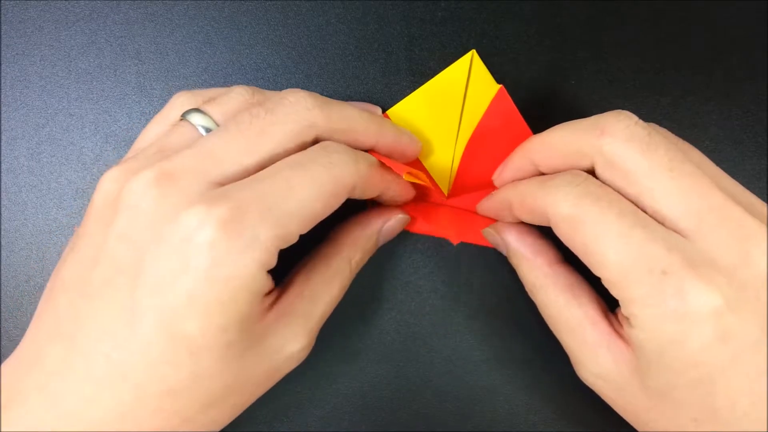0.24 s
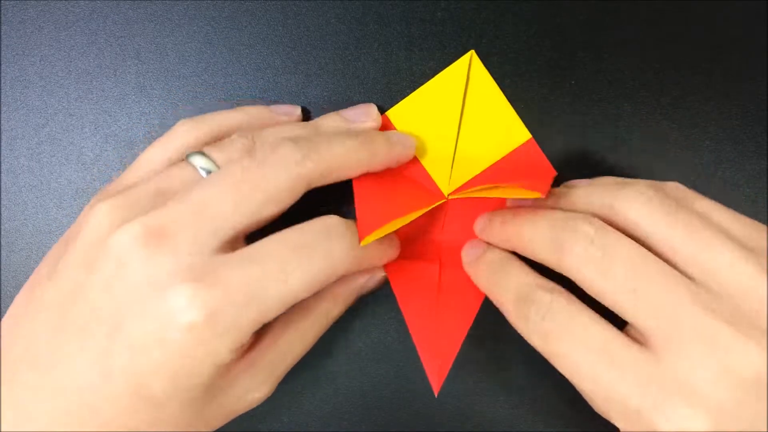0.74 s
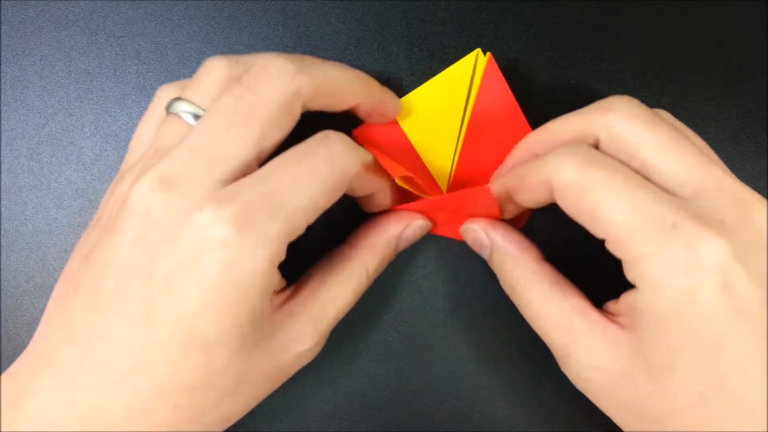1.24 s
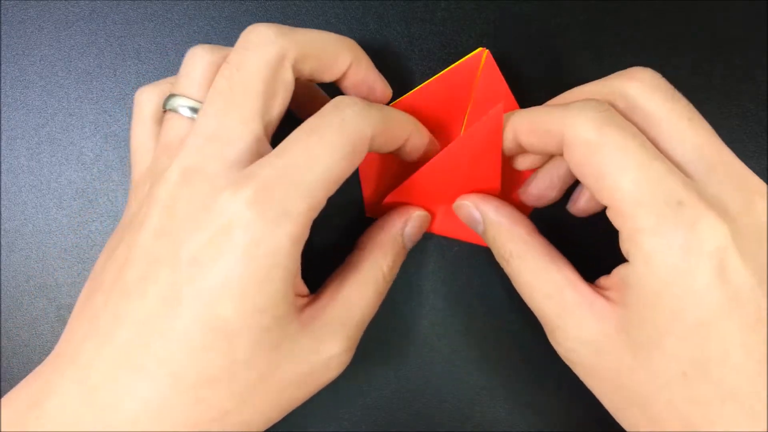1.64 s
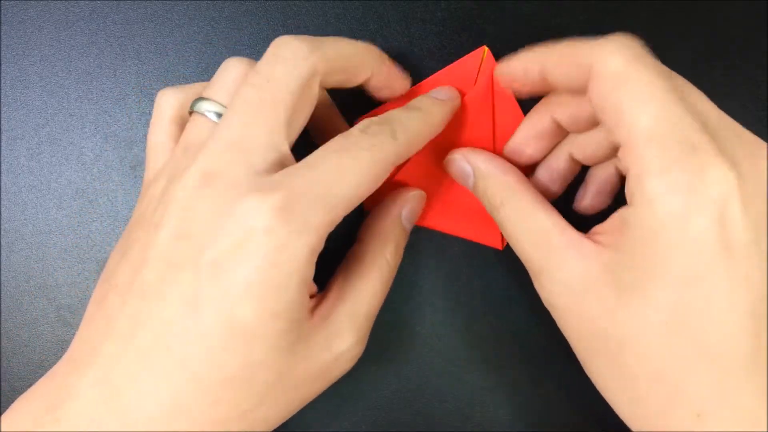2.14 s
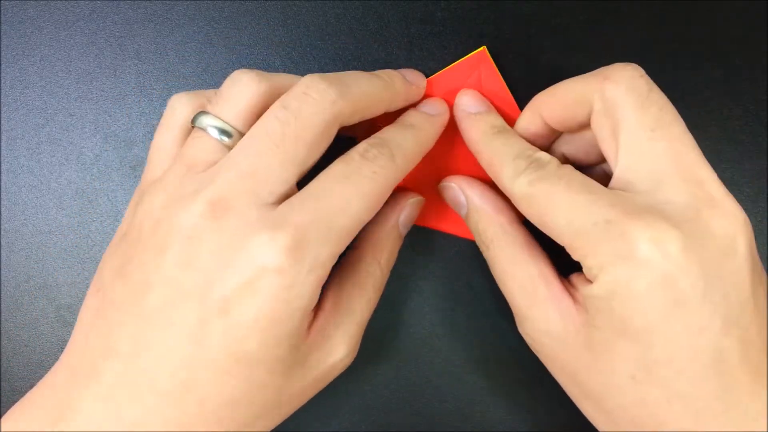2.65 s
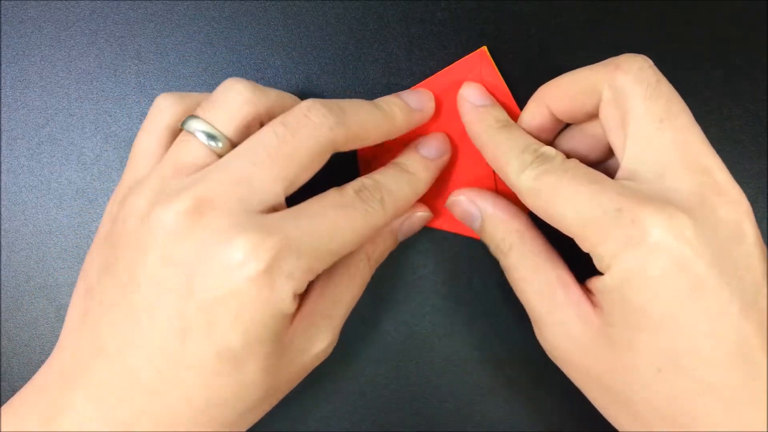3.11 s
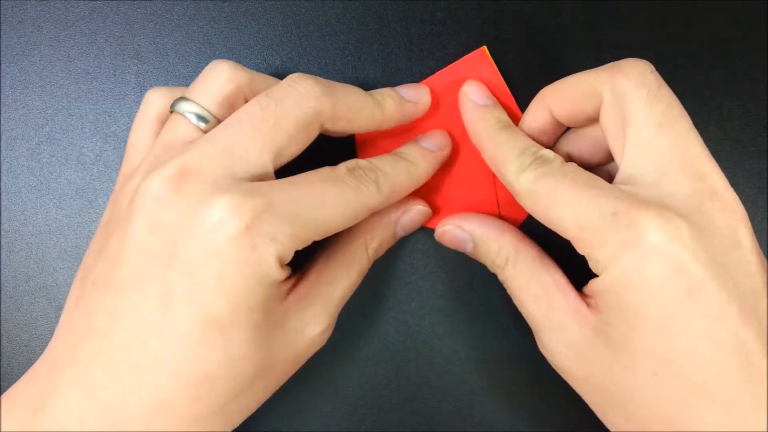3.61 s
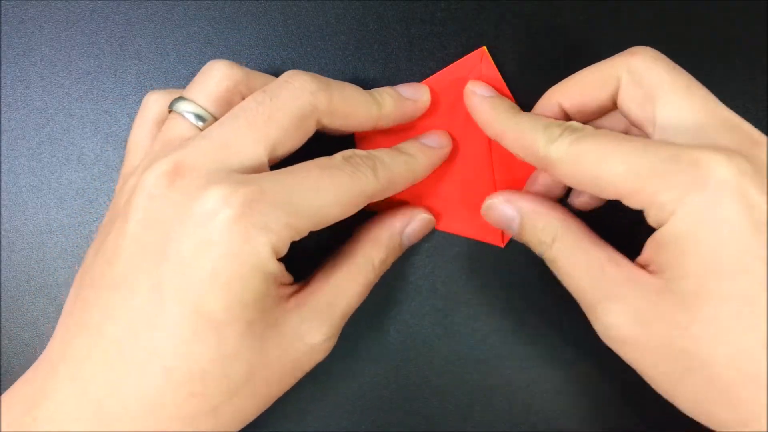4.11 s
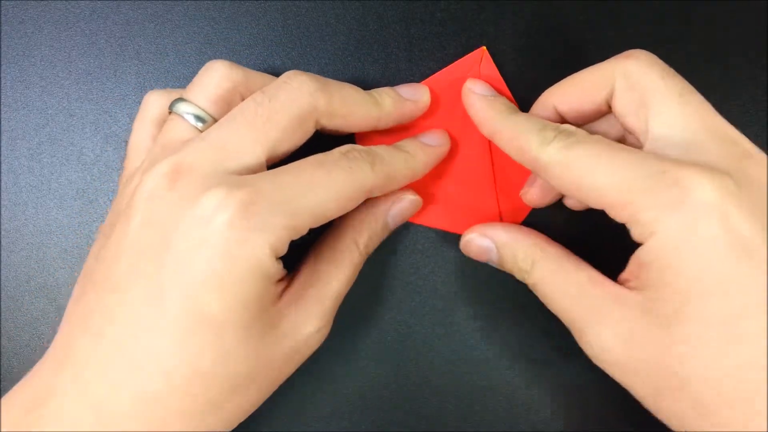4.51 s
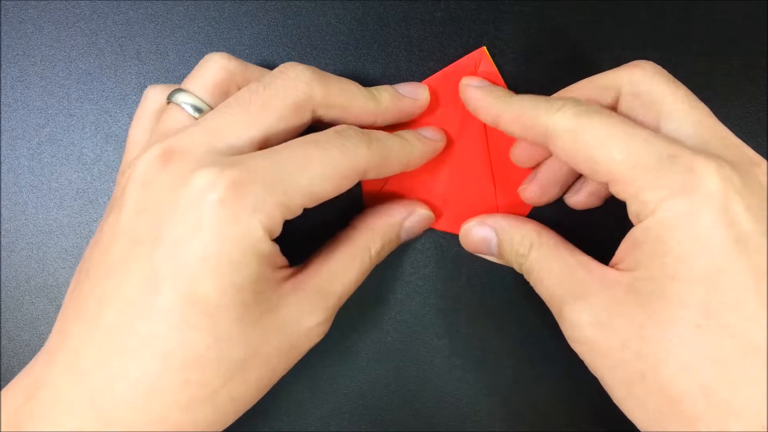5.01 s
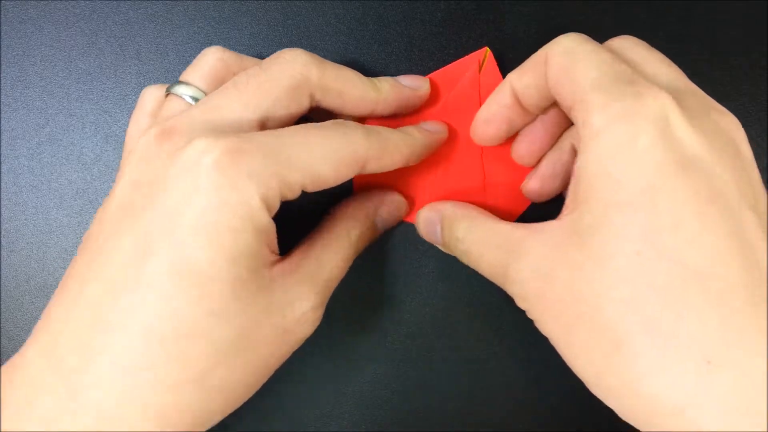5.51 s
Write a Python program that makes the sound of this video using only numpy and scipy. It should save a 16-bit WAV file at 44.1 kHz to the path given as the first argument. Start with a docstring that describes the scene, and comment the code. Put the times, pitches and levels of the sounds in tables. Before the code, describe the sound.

Close, dry snaps and crinkles of paper being folded, thinning into faint ticks and fingers rubbing the creases flat.

```python
"""A small sheet of stiff paper is folded and creased on a table, close to a phone with two microphones.
Each crease buckles in a burst of impulses that excites damped modes of the table, flaps and fibres.
Between the bursts, stick-slip friction of skin on paper drives the same modes, damped by the fingers.
Under it lie quiet room tone, microphone hiss and a faint wavering hum."""
import sys
import numpy as np
from scipy import signal
from scipy.fft import rfft, irfft
from scipy.io import wavfile
from scipy.ndimage import uniform_filter1d

SR = 44100
rng = np.random.default_rng(int(sys.argv[2]) if len(sys.argv) > 2 else 0)


def persist_wave(psi):
    """Save psi, clipped to +-1, as 16-bit WAV."""
    counts = np.round(np.clip(psi, -1, 1) * 32767).astype(np.int16)
    wavfile.write(sys.argv[1], SR, np.atleast_2d(counts).T)


N = 254016

# Spectral density of room tone and microphone hiss: f/Hz, relative level/dB
ROOM_SPECTRUM = [(20, -37), (32, -15), (60, -18), (110, -5), (180, -2.5), (330, -8.5), (620, -13),
                 (1200, -19.5), (2500, -23), (5000, -25.5), (7500, -30), (12000, -27.5), (16000, -27.5)]
# Swells and dips of the room's bass: t/s, gain/dB
BASS_SWELL = [(0, 1), (.5, 2.5), (1.2, -1), (1.9, -6.5), (2.4, 2.5), (3.5, -1), (4.2, 1), (5.76, 1.5)]
# Hands resting on the sheet: t/s, rustle level/dB, flutter level/dB
RESTING_TOUCH = [(0, -72, -79), (1.5, -69, -68), (2.3, -67.5, -65), (3.1, -81, -74), (3.5, -88, -94),
                 (4.6, -88, -81), (5.0, -70, -66), (5.76, -105, -83)]
# Strokes of skin over paper: t/s, hold/s, rustle level/dB, flap flutter level/dB, fine hiss level/dB
SKIN_STROKES = [(0.021, 0.014, -49.5, -54.5, -55.5), (0.183, .01, -66, -64, -69),
                (0.313, .02, -66.5, -60, -69), (.478, 0.055, -55.5, -55, -61),
                (.61, 0.016, -54.5, -57.5, -57), (0.654, 0.044, -61, -61.5, -69),
                (0.866, 0.03, -57.5, -60, -71), (1.105, 0.015, -56, -56, -61), (1.16, .02, -59.5, -78, -65),
                (1.236, 0.016, -59, -55.5, -62), (1.39, 0.016, -51, -56, -57),
                (1.421, 0.014, -47, -67, -46.5), (1.486, 0.035, -57.5, -59.5, -65),
                (1.67, 0.043, -64.5, -59.5, -71), (1.769, 0.064, -51, -63, -54),
                (1.856, 0.042, -46.5, -56.5, -50), (1.93, 0.083, -53.5, -57, -57.5),
                (2.076, 0.029, -46, -55.5, -49.5), (2.22, 0.08, -60.5, -59.5, -65),
                (2.388, 0.026, -55, -71, -63), (2.463, 0.019, -52, -58.5, -53.5),
                (2.6, 0.0085, -67.5, -67, -70), (2.73, 0.014, -65, -67, -71), (2.835, 0.012, -62, -66, -66),
                (3.096, 0.032, -60.5, -62, -65), (3.185, 0.12, -61.5, -66, -63),
                (3.792, 0.023, -68, -64.5, -71), (3.952, .05, -65.5, -66, -69),
                (4.03, 0.015, -60.5, -66, -64), (4.15, 0.016, -64.5, -73, -66.5),
                (4.274, 0.019, -62.5, -64.5, -59.5), (4.845, .03, -71, -59, -72),
                (5.058, 0.021, -64.5, -69, -65), (5.227, 0.027, -58.5, -66, -61.5),
                (5.359, 0.023, -59, -62.5, -64), (5.45, .02, -67, -65, -69),
                (5.567, 0.041, -59.5, -58.5, -58), (5.747, .02, -65, -69, -67)]
# Modes of the four ringing parts: f/Hz, bandwidth/Hz, relative level/dB
TABLE_MODES = [(323, 182, 8.5), (645, 340, 9.5), (758, 293, 10.5), (1060, 360, 3)]
FLAP_MODES = [(1115, 790, -5.5), (1520, 480, 1), (2290, 910, 0.5)]
CREASE_MODES = [(2570, 900, -7), (3690, 1270, 3.5), (5085, 616, 10), (5826, 467, 11.5), (6700, 2440, 0.5)]
FIBRE_MODES = [(7200, 300, -8), (8700, 1410, 0.5), (9910, 1240, 5), (12940, 4370, 2.5), (14060, 3350, -1.5)]
# Factors on the left-right level difference: table, flap, crease, fibre
PAN_FACTORS = [.4, .6, 1.1, 1.3]
# Buckles: t/s, snap level/dB, colour/octaves above 1 kHz, table thud level/dB, T60/ms, leftward pan/dB
BUCKLE_EVENTS = [(0.03, -22, 2.5, -47.5, 11.6, -4.5), (0.044, -32.5, 1.73, -46.5, 21, -8),
                 (0.1722, -54.5, 0.9, -48.0, 8.6, -6.0), (0.322, -49, 1.74, -47, 12, -4.0),
                 (0.3536, -53, 1.9, -49, 36.0, -3), (0.462, -40, 2.3, -64.0, 22, -2.5),
                 (0.483, -38.5, 2.07, -53.0, 28, -2), (0.4949, -41, 3, -39.5, 16, -9.5),
                 (0.52, -43, 2.7, -53, 15, -6.5), (0.5877, -40.5, 1.7, -36.5, 14, -5),
                 (0.5994, -37.5, 1.3, -35.5, 3.8, -4), (0.6096, -43, 1.7, -39.5, 31, -5),
                 (0.6168, -43.5, 1.1, -32.5, 15, -8), (0.6263, -57, 2.4, -44, 23, -7),
                 (0.9271, -52.5, 1.46, -54.5, 89, -4), (1.0864, -56, 1.3, -48.5, 72, 8),
                 (1.0959, -41.5, 1.62, -49.5, 26.0, -5.5), (1.1285, -51, 1.0, -47.5, 51, -10),
                 (1.208, -24.5, 0.71, -29.5, 23.5, -4.5), (1.349, -49, 1.36, -55.5, 130, -4),
                 (1.3914, -32, 2.05, -48, 26, -7), (1.435, -35.5, 1.4, -84, 94, -4),
                 (1.456, -26.5, 1.66, -78, 21, -6), (1.748, -18.5, 2.25, -80.0, 16.4, -4.5),
                 (1.8489, -41, 1.34, -78, 120, -6), (1.931, -45.5, 1.7, -50.5, 56, -11),
                 (1.9522, -37.5, 2.25, -48, 20, 7.5), (1.9718, -50, 0.81, -53, 13, -6),
                 (1.992, -44, 2.3, -75, 46, -9), (2.0071, -48, 2.1, -65, 77, -16.5),
                 (2.0135, -35, 1.53, -43, 18, 9.5), (2.0991, -35, 2.14, -48.5, 24, -5),
                 (2.1143, -37.5, 2.5, -42, 11, -12), (2.1792, -36, 2.1, -53, 30, 0.5),
                 (2.454, -22, 2.28, -45, 14.5, -7.5), (2.5855, -47, 2.45, -64, 13, -6),
                 (2.7177, -51, 0.76, -79.0, 16.0, -7.0), (2.7257, -48.5, 1.25, -83, 10, -3.0),
                 (2.813, -46, 2.06, -58, 73, -7), (2.839, -51.5, 1.7, -55, 31, -9),
                 (3.08, -41, 1.1, -63, 13, -1), (3.0891, -48.5, 1.94, -59, 17, -10),
                 (3.1038, -53, 2, -71, 18, -4), (3.1132, -42, 2.1, -69, 20, -7),
                 (3.119, -47, 2.0, -66, 7.3, 1), (3.2137, -49.5, 1.8, -55, 17, -1),
                 (3.781, -60, 1.9, -68, 15.0, -10), (3.7918, -57, 1.7, -59, 29.0, -3.0),
                 (3.97, -61, 3.1, -54.5, 16, 0.0), (4.016, -48.5, 2.3, -62, 22, -8),
                 (4.0606, -48, 2.76, -62, 42, -4), (4.2562, -42.5, 2.08, -58, 31.0, -8),
                 (4.7856, -47.5, 2.9, -70.0, 8.1, -6), (4.842, -55, 2.4, -52.0, 32, -7.0),
                 (4.857, -53, 2.0, -47.5, 39, -5), (4.8708, -52.5, 2.35, -48, 27, -6),
                 (4.996, -43.5, 2, -54, 16, -4), (5.0568, -46.5, 2.23, -77.0, 53, -7),
                 (5.2233, -44, 1.9, -53, 57, 6), (5.2326, -37.5, 1.68, -63, 15, -8),
                 (5.3741, -37.5, 1.93, -56, 26, -3.5), (5.4406, -41, 1.6, -72, 17, -2.5),
                 (5.4479, -53.5, 2.4, -72, 17.0, -10), (5.524, -53, 2.3, -47, 33, -3),
                 (5.73, -49, 2.1, -52, 29.0, -4)]
# Envelope of the hum: t/s, level/dB
HUM_ENVELOPE = [(0, -85), (2.2, -85), (2.5, -70), (3.2, -72), (3.4, -66), (3.7, -67), (3.9, -73),
                (4.6, -72), (5.1, -68), (5.76, -73)]

LAG_S, LAG_SPREAD_S = 5.5e-5, 2e-5  # the left port, behind the phone, hears later; varies by crease
BURST_SAMPLES = 4096


def undb(db):
    """Amplitude ratio of a level in decibels."""
    return 10 ** (np.asarray(db) / 20)


def unit_rms(x):
    """Normalisation: the average of the two channels gets rms 1."""
    return x / np.sqrt(np.mean(np.mean(x, axis=0) ** 2))


def room(level_db=-59.5, bass_hz=220):
    """Incoherent noise: room tone and microphone hiss are uncorrelated at the two ports."""
    hz = np.maximum(np.fft.rfftfreq(N, 1 / SR), 1)
    knot_hz, knot_db = np.transpose(ROOM_SPECTRUM)
    density_db = np.interp(np.log(hz), np.log(knot_hz), knot_db)
    spectrum = rfft(rng.standard_normal((2, N))) * undb(density_db)
    bass = irfft(spectrum / (1 + (hz / bass_hz) ** 4), N)
    swell = undb(np.interp(np.arange(N) / SR, *np.transpose(BASS_SWELL)))
    return unit_rms(irfft(spectrum, N) + (swell - 1) * bass) * undb(level_db)


def stroke_levels():
    """Power addition: strokes swell, hold and die over the resting touch; rustle, flutter, hiss in dB."""
    rise_db_per_s, fall_db_per_s = [275, 171, 260], [232, 155, 238]
    t = np.arange(N) / SR
    times, rustle_db, flutter_db = np.transpose(RESTING_TOUCH)
    hiss_db = rustle_db - 1
    power = [undb(2 * np.interp(t, times, db)) for db in (rustle_db, flutter_db, hiss_db)]
    for onset, hold_s, *peak_db in SKIN_STROKES:
        span = slice(max(int((onset - .3) * SR), 0), int((onset + hold_s + .4) * SR))
        early, late = np.maximum(onset - t[span], 0), np.maximum(t[span] - onset - hold_s, 0)
        for k in range(3):
            power[k][span] += undb(2 * (peak_db[k] - rise_db_per_s[k] * early - fall_db_per_s[k] * late))
    return 10 * np.log10(power)


def flicker(rate_hz):
    """Low-pass random modulation: held random values, smoothed twice, with a spread near 1."""
    hold = int(SR / rate_hz)
    steps = np.repeat(rng.standard_normal(N // hold + 1), hold)
    return 1.57 * uniform_filter1d(uniform_filter1d(steps, hold), hold)[:N]


def port_spectra(slips, hz, incoherence, lag_s, treble_hz=1500):
    """Partial coherence: the ports share one path, longer to the left, and each has its own treble."""
    delay = np.array([np.exp(-2j * np.pi * hz * lag_s), np.ones(len(hz))])
    return rfft(slips[0]) * delay + incoherence * hz / (hz + treble_hz) * rfft(slips[1:])


def modal_response(hz, modes, offsets_db):
    """Superposed damped modes of alternate sign; far below and above them the sheet radiates little."""
    hz = np.maximum(hz, 1)
    low, high = 1j * hz / (.65 * modes[0][0]), 1j * hz / (1.3 * modes[-1][0])
    band = low ** 2 / (1 + np.sqrt(2) * low + low ** 2) / (1 + np.sqrt(2) * high + high ** 2)
    return band * sum((-1) ** k * undb(db + offset) / (1 + 1j * (hz / f - f / hz) * f / width)
                      for k, ((f, width, db), offset) in enumerate(zip(modes, offsets_db)))


def pan(part, span, pan_db):
    """Level difference: each channel is set to rms 1 over span samples, then left pan_db over right."""
    rms = np.sqrt(np.mean(part[:, :span] ** 2, axis=1, keepdims=True))
    return part / rms * undb([[pan_db / 2], [-pan_db / 2]])


def rubbing(pan_db=-4, grain_db=3.0, finger_damping=2.14):
    """Stick-slip friction: dense tiny slips, a few larger, excite the paper under flickering pressure."""
    hz = np.fft.rfftfreq(N, 1 / SR)
    pressure_db = 1.33 * flicker(110)
    grains = undb(grain_db * np.minimum(rng.exponential(size=N), 7))
    rustle = FLAP_MODES[-1:] + CREASE_MODES, PAN_FACTORS[2]
    flutter = TABLE_MODES + FLAP_MODES, PAN_FACTORS[0]
    hiss = FIBRE_MODES, PAN_FACTORS[3]
    out = 0
    for (modes, pan_factor), level_db in zip((rustle, flutter, hiss), stroke_levels()):
        slips = rng.standard_normal((3, N)) * grains
        drive = port_spectra(slips, hz, incoherence=1.0, lag_s=LAG_S)
        damped = [(f, width * finger_damping, db) for f, width, db in modes]
        part = irfft(drive * modal_response(hz, damped, np.zeros(len(modes))), N)
        envelope = undb(level_db + pressure_db + 0.64 * flicker(90))
        out = out + unit_rms(pan(part, N, pan_db * pan_factor)) * envelope
    return out


def buckle(parts_db, t60_ms, pan_db, spikiness=2.7, first_slip=12.9, tail_db=-33, tail_t60_ms=80):
    """Buckling: a crease gives way in a spiky burst with a short room tail, and rings all four parts."""
    ms, hz = 1000 * np.arange(BURST_SAMPLES) / SR, np.fft.rfftfreq(BURST_SAMPLES, 1 / SR)
    noise = rng.standard_normal((3, BURST_SAMPLES))
    slips = np.sign(noise) * np.abs(noise) ** spikiness * undb(-60 * ms / t60_ms)
    slips[0, :3] += first_slip * np.array([.3, 1, .3])  # the first give is the hardest
    tail = rng.standard_normal((2, BURST_SAMPLES)) * undb(tail_db - 60 * ms / tail_t60_ms) * first_slip
    lag_s = LAG_S + LAG_SPREAD_S * rng.standard_normal()
    drive = port_spectra(slips, hz, incoherence=0.72, lag_s=lag_s) + rfft(tail)
    scatter_db = 3.0 * rng.standard_normal((4, 5))  # every burst has its own mix of modes
    bodies = [np.array(modes) for modes in (TABLE_MODES, FLAP_MODES, CREASE_MODES, FIBRE_MODES)]
    log_centres = [np.log(modes[:, 0]).mean() for modes in bodies]
    out = 0
    for modes, level_db, scatter, pan_factor in zip(bodies, parts_db, scatter_db, PAN_FACTORS):
        # modes next to a strongly rung neighbour are rung harder too
        tilt_db = 0.16 * np.interp(np.log(modes[:, 0]), log_centres, parts_db)
        part = irfft(drive * modal_response(hz, modes, tilt_db + scatter[:len(modes)]), BURST_SAMPLES)
        out = out + undb(level_db) * pan(part, span=200, pan_db=pan_db * pan_factor)
    return out


def creases(loss_db_per_octave2=5.5):
    """Selective excitation: each buckle rings most the parts of the sheet nearest its colour."""
    part_octaves = np.array([0.73, 2.24, 3.18])  # flap, crease, fibre, above 1 kHz
    out = np.zeros((2, N + BURST_SAMPLES))
    for onset, snap_db, colour, thud_db, t60_ms, pan_db in BUCKLE_EVENTS:
        start = int(onset * SR)
        sheet_db = snap_db - loss_db_per_octave2 * (part_octaves - colour) ** 2
        out[:, start:start + BURST_SAMPLES] += buckle([thud_db, *sheet_db], t60_ms, pan_db)
    return out[:, :N]


def hum(pitch_hz=78.8, waver_hz=3, waver_db=2.5):
    """Random frequency and amplitude modulation: a low tone wavers, and comes up about half way."""
    phase = 2 * np.pi * np.cumsum(pitch_hz + waver_hz * flicker(9)) / SR
    level_db = np.interp(np.arange(N) / SR, *np.transpose(HUM_ENVELOPE)) + waver_db * flicker(12)
    return np.sqrt(2) * np.sin(phase) * undb(level_db)


def scene():
    """Linear superposition of the paper's sounds and the background."""
    return creases() + rubbing() + room() + hum()


def record(dry, cutoff_hz=15850):
    """Band limiting: the phone's steep low-pass cuts the top of the treble."""
    return signal.sosfilt(signal.ellip(10, .2, 75, cutoff_hz, fs=SR, output="sos"), dry)


dry = scene()
out = record(dry)
persist_wave(out)
```